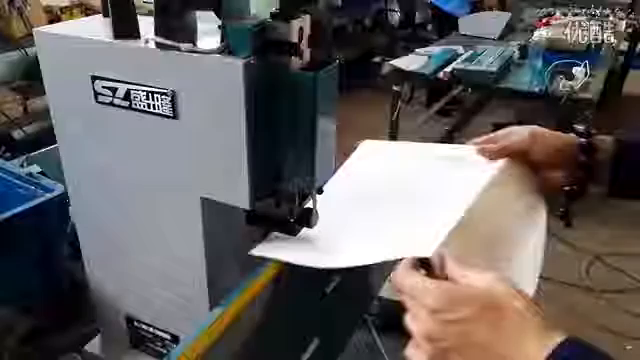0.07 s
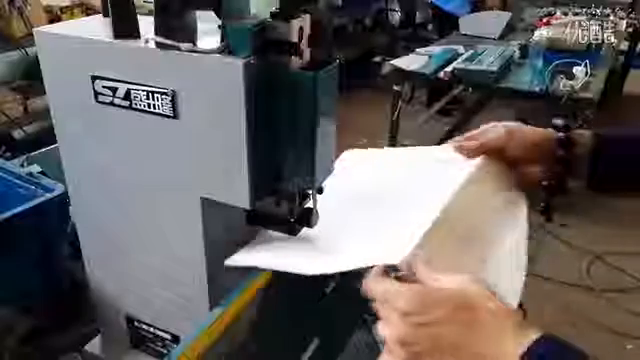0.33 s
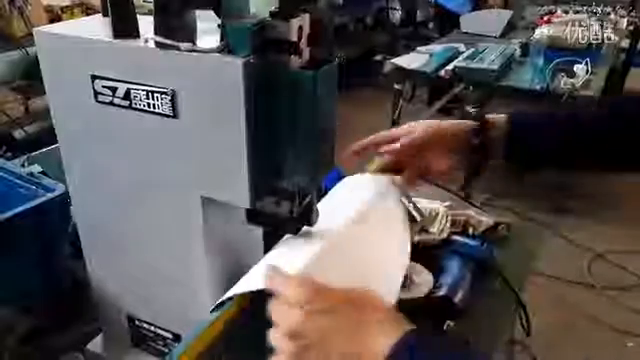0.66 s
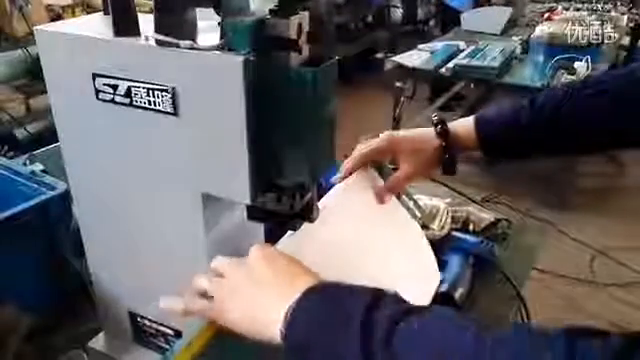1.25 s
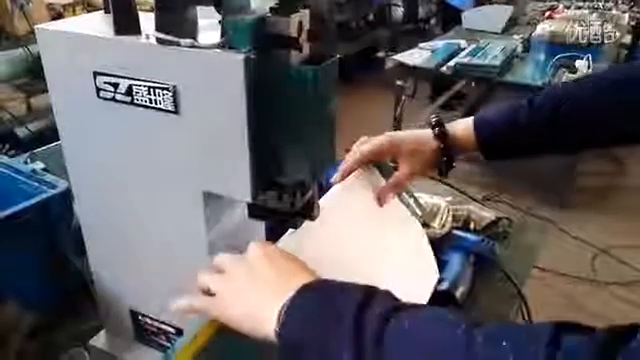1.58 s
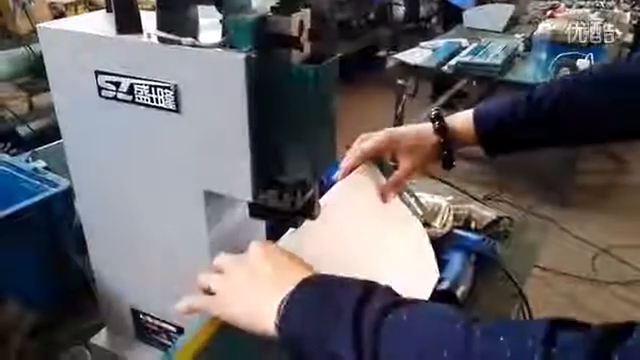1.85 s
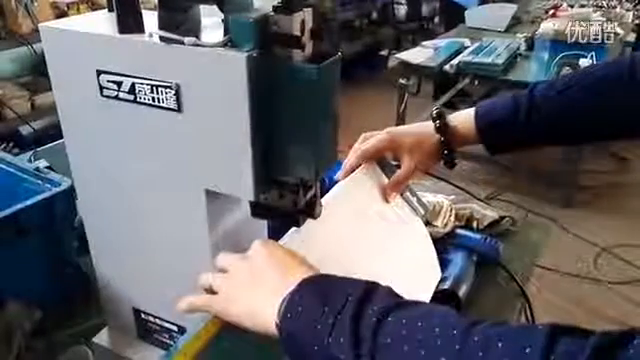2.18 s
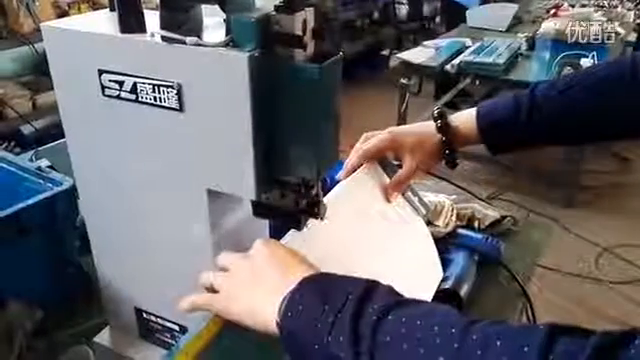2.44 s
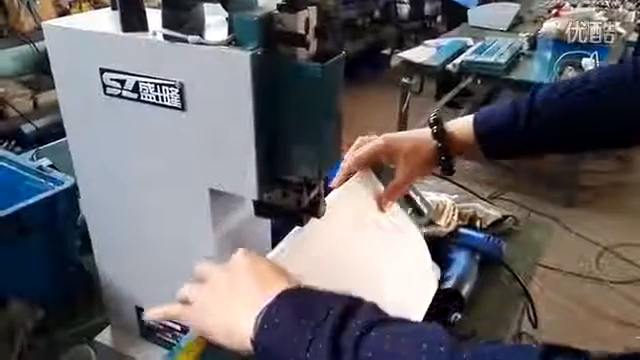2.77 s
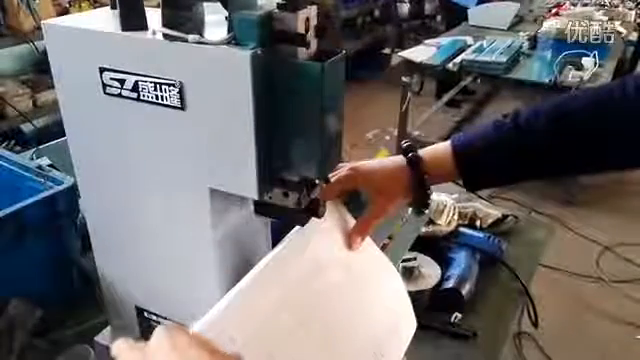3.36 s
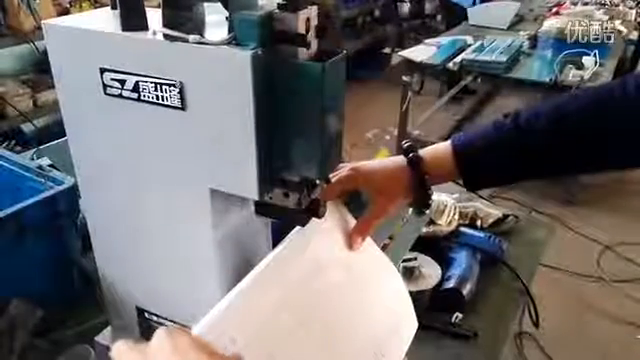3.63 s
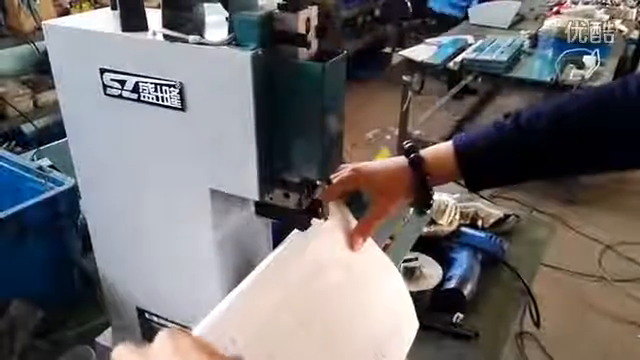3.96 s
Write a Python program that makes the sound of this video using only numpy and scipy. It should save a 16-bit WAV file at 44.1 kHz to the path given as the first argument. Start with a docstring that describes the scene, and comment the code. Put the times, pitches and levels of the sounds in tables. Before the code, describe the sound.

A wire stitching machine clatters through two metallic strokes over a low motor hum.

```python
"""A low hum, paper sliding, then two clattering strokes of a wire stitcher in a workshop.
Motor and flywheel idle while a folded sheet rubs over the saddle. Twice the clutch snaps in and
the head runs through a stroke: steel parts click, the frame knocks, the linkage rattles and the
staple is driven home with a thump. Between the strokes something clunks farther off."""
import sys
import numpy as np
from scipy import signal
from scipy.fft import rfft, irfft
from scipy.io import wavfile

SR = 44100
rng = np.random.default_rng(int(sys.argv[2]) if len(sys.argv) > 2 else 0)


def wav_out(sig):
    """Save sig, one row per channel (or a flat mono array), as 16-bit PCM at SR to the path in sys.argv[1]."""
    wavfile.write(sys.argv[1], SR, np.round(np.clip(np.atleast_2d(sig).T, -1, 1) * 32767).astype(np.int16))


N = 176400
TIME_S = np.arange(N) / SR

# Drive rumble. Each row: frequency in Hz, spectral density in dB.
RUMBLE_SPECTRUM = [(20, -27), (42, -19), (80, -10), (110, -15), (160, -2.5), (205, -5), (300, -2),
                   (380, -3.5), (500, -6.5), (680, -9), (860, -15), (1015, -8), (1130, -16), (1350, -16),
                   (1540, -11.5), (1700, -18), (2000, -19), (2900, -20), (3700, -26), (6000, -36.5),
                   (9000, -38), (12500, -40.5)]
# Drive hum lines. Each row: frequency in Hz, level in dB.
HUM_LINES = [(84, -58), (243.5, -42.5), (326, -41.5), (416, -51), (490, -53), (652, -44.5), (673, -47),
             (717, -61)]
# Resonances of the distant clunk. Each row: frequency in Hz, width in Hz, relative level in dB.
CLUNK_MODES = [(467, 170, -6), (778, 40, -5), (1110, 100, -6), (1670, 680, -4), (2400, 210, -14)]
# Sheet rubbing on the saddle; its edge scraping home. Each row: time in seconds, level in dB.
SLIDE_ENVELOPE = [(.2, -40.5), (.45, -36.5), (.56, -36), (.65, -29.5), (.74, -35.5), (.88, -43),
                  (1.0, -39.5), (1.2, -35.5), (1.36, -49.5), (1.46, -49), (1.58, -40), (1.73, -52.5),
                  (1.8, -44.5), (1.89, -55), (2.03, -44.5), (2.85, -39.5), (2.98, -37), (3.2, -41.5),
                  (3.29, -57)]
SCRAPE_ENVELOPE = [(.5, -68), (.6, -42), (.7, -36), (.76, -52), (.85, -80)]
# Sheet rub; edge scrape; linkage rattle. Each row: frequency in Hz, spectral density in dB.
SLIDE_SPECTRUM = [(200, 0), (700, 1.5), (1500, 4), (3000, -0.5), (5000, 1), (7000, -2), (9500, 1.5),
                  (13000, -12.5)]
SCRAPE_SPECTRUM = [(500, -12), (1700, 2), (2900, -2), (3800, -22), (10000, -17)]
RATTLE_SPECTRUM = [(100, -24), (500, -7), (950, -1), (2300, -1), (3100, -1.5), (3700, -8), (4800, -3.5),
                   (7000, -10.5), (9500, -8), (13000, -24)]
# Linkage rattle as the head moves. Each row: time in seconds, level in dB.
RATTLE_ENVELOPE = [(2.0, -55), (2.06, -30), (2.13, -30), (2.21, -28), (2.27, -25.5), (2.4, -28.5),
                   (2.48, -32), (2.53, -31.5), (2.61, -24.5), (2.68, -34.5), (2.74, -30), (2.82, -33.5),
                   (2.95, -45), (3.1, -67), (3.59, -48), (3.63, -29), (3.73, -36.5), (3.85, -33.5),
                   (3.93, -30), (4.0, -36)]
# Cabinet and saddle thumps. Each row: start in seconds, level in dB, pitch in Hz, decay in seconds.
THUMPS = [(1.443, -16, 314, .013), (1.460, -20, 174.5, 0.033), (1.51, -20.5, 200, 0.016),
          (1.976, -34.5, 84.7, 0.073), (2.36, -28.5, 128, 0.042), (2.432, -26.5, 170, 0.036),
          (2.55, -19.5, 283, 0.032), (2.574, -20, 325, 0.016), (2.598, -19, 304, .026),
          (2.638, -22.5, 274.2, 0.072), (2.708, -31.5, 111.7, 0.054), (2.78, -15.5, 150.3, 0.017),
          (3.78, -26.5, 140, 0.052), (3.851, -32, 138.5, .066), (3.934, -26, 157.4, 0.059)]
# Small steel parts; frame. Each row: frequency in Hz, spectral density in dB.
STEEL_SPECTRUM = [(300, -28), (1500, -28), (3000, -3), (3600, -9.5), (4400, -1), (5050, 2.5), (5450, 1.5),
                  (5900, 0), (6400, -2.5), (7000, -4), (7600, -1.5), (8700, -3), (10000, -6.5), (11300, -8),
                  (13000, -21)]
FRAME_SPECTRUM = [(80, -19), (400, -10), (750, -5), (1050, -2.5), (1350, -3), (1700, -2.5), (2000, -3.5),
                  (2400, -4.5), (3000, -7), (3700, -11.5), (4600, -11.5), (6500, -32), (12000, -25)]
# Ringing of the steel parts; of the frame. Each row: frequency in Hz, relative level in dB, T60 in seconds.
STEEL_MODES = [(4550, -10, .023), (5060, 12, 0.033), (6100, -4, 0.048), (6200, -17, .09),
               (7080, -16, 0.078), (8900, -16, 0.074), (8970, -10.5, 0.14)]
FRAME_MODES = [(1042, 0.5, 0.12), (1220, -5.5, 0.06), (1360, 0, 0.043), (1435, 6, .09), (1640, 0, 0.067),
               (1720, 6.5, .058), (2325, 6, 0.08)]
# Blows of the mechanism. Each row: start in seconds, steel snap in dB, frame knock in dB, contact decay
# in seconds, after-ring in dB, treble tilt in dB per octave, struck part's pitch in Hz, its level in dB.
BLOWS = [(.482, -40, -24.5, 0.0028, -30, -8, 1100, -38), (0.686, -41, -24, .003, -8, 5, 2650, -31),
         (0.711, -40, -27, 0.0044, -21, -1, 1860, -29), (1.204, -20, -17, 0.0013, -16, -3, 1630, -23),
         (1.446, -44.5, -27, 0.0023, -6, -2, 775, -24), (1.51, -48, -30, 0.002, -2, 1, 590, -28),
         (1.78, -30, -32, 0.0036, -17, 5, 9750, -40), (1.964, -37, -31, 0.0018, -14, 3, 850, -18),
         (2.071, -4, -25, 0.0015, -9.5, 4, 4980, -4.5), (2.1195, -32, -15.5, 0.0034, -8, 1, 1100, -26),
         (2.2314, -20.5, -13, 0.0042, -6.5, 0, 1330, -11), (2.254, -18, -16, .0033, -8, -3.5, 950, -27),
         (2.287, -21, -18.5, 0.011, -12, 3, 1080, -21), (2.2933, -24, -13.5, 0.0074, -18, 1, 2450, -16),
         (2.311, -19.5, -19, 0.0077, -17, 9, 1390, -34), (2.341, -15, -37, .0034, -23, 5, 6170, -18),
         (2.371, -4.5, -23, .0018, -16.5, -5.5, 5320, -12.5),
         (2.4217, -7.5, -7, 0.003, -38, 4, 8600, -11.5), (2.430, -36, -18, 0.0043, -14, 3, 2320, -13.5),
         (2.549, -26.5, -21.5, 0.015, -11, -8, 1010, -30), (2.567, -5.5, -12, 0.0069, -22, -2, 5540, -10),
         (2.575, -13, -24, .002, -12, 2, 9100, -10), (2.691, -5, -23, 0.0021, -27, 0, 8340, -14.5),
         (2.702, -17, -15.5, 0.0046, -14, -1.5, 4050, -20), (2.724, -40, -15.5, 0.0023, -9.5, -1, 940, -33),
         (2.752, -28.5, -22, .005, -7, -2, 8300, -25), (2.7754, -11.5, -8.5, 0.0036, -22, -3, 2910, -19),
         (2.8431, -2.5, -12, 0.0027, -26, 1.5, 4900, -11), (2.896, -27.5, -42, 0.015, -20, 7, 8300, -28),
         (3.054, -22, -48, 0.0069, -12, 6, 8500, -18.5), (3.606, -3, -21, 0.001, -13, 5.5, 5000, -9),
         (3.626, -27, -31, .002, -18, 7, 1150, -24), (3.655, -27, -17.5, 0.0055, -7.5, -3, 1920, -31),
         (3.764, -13.5, -13, 0.0025, -9.5, -1, 1170, -10.5),
         (3.784, -11.5, -16, 0.0021, -15, -1, 4700, -18), (3.7868, -28, -9.5, .0021, -14, 2, 1610, -12),
         (3.819, -36, -18, .004, -10, 6, 1350, -20), (3.825, -17, -14.5, 0.0031, -10, 2.5, 4380, -16),
         (3.844, -20.5, -24, 0.0046, -18, 6, 3100, -21), (3.8722, -14, -42, .003, -13, 4, 4400, -18.5),
         (3.881, -24, -33, .002, -20, -2, 4830, -20), (3.911, -17, -22, 0.0047, -6, -5, 613, -23),
         (3.954, -8, -11.5, 0.0047, -21, .5, 2430, -12.5), (3.963, -32, -18, 0.0038, -8, 1, 1750, -20)]
# Workshop reverberation. Each row: frequency in Hz, T60 in seconds.
ROOM_T60 = [(100, 0.54), (1000, 0.19), (4000, 0.44), (12000, 0.14)]
# Likeness of the two microphones. Each row: frequency in Hz, correlation from 0 to 1.
MIC_CORRELATION = [(30, 1), (180, 0.98), (350, 0.92), (700, 0.54), (1400, 0.059), (3000, 0.02),
                   (12000, 0.019)]
# Microphone imbalance. Each row: frequency in Hz, left minus right in dB.
MIC_BALANCE = [(60, 1), (350, -2), (700, -.5), (1400, 0.5), (3000, -1.5), (5500, 1.5), (7500, -2.5),
               (9000, -6), (12000, -10)]
# Opening fade. Each row: time in seconds, gain in dB.
FADE_IN = [(.2, -77), (.235, -32.5), (.3, -19.5), (.395, -10), (.41, -5.5), (.48, 1)]

ATTACK_S, BAND_LIMIT_HZ = 0.0014, 12200


def amp(db):
    """Decibels to gain."""
    return 10 ** (np.asarray(db) / 20)


def unit_rms(x):
    """Scales to rms 1."""
    return x / np.sqrt(np.mean(x ** 2) + 1e-20)


def lookup(table, hz):
    """Interpolates on a log-frequency axis."""
    table_hz, value = np.transpose(table)
    return np.interp(np.log(hz + 1), np.log(table_hz + 1), value)


def envelope(table):
    """Gain over time from rows of seconds and dB."""
    return amp(np.interp(TIME_S, *np.transpose(table)))


def add(mix, start_s, sound):
    """Mixes a sound in at start_s."""
    span = mix[:, round(start_s * SR):][:, :sound.shape[-1]]
    span += sound[..., :span.shape[1]]


def wander(rate_hz):
    """Random motion up to about rate_hz, rms 1."""
    t = np.linspace(0, N / SR, 1024)
    rolloff = 1 + (np.fft.rfftfreq(len(t), t[1]) / rate_hz) ** 4
    slow = irfft(rfft(rng.standard_normal(len(t))) / rolloff)
    return np.interp(TIME_S, t, unit_rms(slow))


def colour(x, spectrum, tilt_db_per_oct=0, size=2048):
    """Minimum-phase filter of unit energy; the tilt acts mainly above 1 kHz."""
    hz = abs(np.fft.fftfreq(size, 1 / SR))
    gain = amp(lookup(spectrum, hz) + tilt_db_per_oct * np.log2(1 + hz / 1000))
    gain /= 1 + (hz / BAND_LIMIT_HZ) ** 20
    log_response = np.conj(signal.hilbert(np.log(gain + 1e-5)))
    taps = np.fft.ifft(np.exp(log_response)).real
    return signal.fftconvolve(x, taps[None] / np.linalg.norm(taps), axes=1)[:, :x.shape[1]]


def diffuse(pair):
    """Makes two unrelated signals alike in the bass, as at two close microphones."""
    a, b = rfft(pair)
    same = lookup(MIC_CORRELATION, np.fft.rfftfreq(pair.shape[1], 1 / SR))
    return irfft(np.array([a, same * a + np.sqrt(1 - same ** 2) * b]), pair.shape[1])


def noise(size):
    """Diffuse stereo white noise."""
    return diffuse(rng.standard_normal((2, size)))


def resonance(hz, width_hz, size):
    """Stereo noise in one resonance, rms 1."""
    radius = np.exp(-np.pi * width_hz / SR)
    poles = [1, -2 * radius * np.cos(2 * np.pi * hz / SR), radius ** 2]
    return unit_rms(diffuse(signal.lfilter([1, 0, -1], poles, rng.standard_normal((2, size)))))


def grains(per_s, spread_db):
    """Dense random clicks of uneven size, rms 1."""
    sizes = amp(spread_db * np.minimum(rng.exponential(1, (2, N)), 4))
    signs = rng.choice([-1., 1.], (2, N))
    hits = rng.random((2, N)) < per_s / SR
    return unit_rms(diffuse(sizes * signs * hits))


def room(x, build_s=0.01):
    """The workshop's short tail, longest in the bass and near 4 kHz."""
    hz, t, bands = signal.stft(noise(SR // 2), SR, nperseg=256)
    shape = np.minimum(t / build_s, 1) * amp(-60 * t / lookup(ROOM_T60, hz)[:, None])
    tail = signal.istft(bands * shape, SR, nperseg=256)[1]
    return signal.fftconvolve(x, tail / np.linalg.norm(tail[0]), axes=1)[:, :N]


def reflections(x, paths=7, span_s=0.004, level_db=-2.5):
    """Echoes off cabinet, saddle and sheet comb the sound differently at each microphone."""
    taps = np.zeros((2, SR // 20))
    for side in taps:
        delays = 20 + (rng.random(paths) * span_s * SR).astype(int)
        side[delays] = amp(level_db) * rng.choice([-1., 1.], paths) / np.sqrt(paths)
        side[0] = 1
    return signal.oaconvolve(x, taps / np.linalg.norm(taps[0]), axes=1)[:, :x.shape[1]]


def drive(rumble_db=-31.5, flutter_db=1.23, drift_rad=0.94, drift_hz=4.66, waver_db=3.5):
    """Motor and flywheel: fluttering rumble under wavering hum lines."""
    rumble = colour(noise(N), RUMBLE_SPECTRUM, size=8192)
    rumble *= amp(rumble_db + flutter_db * wander(rate_hz=48.6))
    hum = 0
    for hz, db in HUM_LINES:
        mic_rad = np.arccos(lookup(MIC_CORRELATION, hz)) * np.array([[0], [1]])
        phase = 2 * np.pi * hz * TIME_S + drift_rad * wander(drift_hz)
        hum += np.sqrt(2) * amp(db + waver_db * wander(drift_hz)) * np.sin(phase + mic_rad)
    return rumble + hum


def distant_clunk(start_s=3.153, rise_s=0.043, scrape_s=0.053, ring_s=0.051, ring_hz=778, level_db=-26):
    """Something scrapes and rings across the workshop, blurred by distance."""
    t = np.maximum(TIME_S - start_s, 0)
    past_peak_s = np.maximum(t - rise_s, 0)
    scrape = sum(amp(db) * resonance(hz, width_hz, N) for hz, width_hz, db in CLUNK_MODES)
    scrape *= np.exp(-past_peak_s / scrape_s)
    ring = amp(1) * np.sin(2 * np.pi * ring_hz * t) * np.exp(-past_peak_s / ring_s)
    return amp(level_db) * np.minimum(t / rise_s, 1) * (scrape + ring)


def paper(catch_db=1):
    """The sheet rubs and catches on the saddle in fine grains; its edge scrapes in coarser ones."""
    catching = amp(catch_db * wander(rate_hz=33.7))
    rub = colour(grains(per_s=4000, spread_db=-2), SLIDE_SPECTRUM)
    scrape = colour(grains(per_s=180, spread_db=3), SCRAPE_SPECTRUM)
    return envelope(SLIDE_ENVELOPE) * catching * rub + envelope(SCRAPE_ENVELOPE) * scrape


def linkage(judder_db=2):
    """Cams and slides rattle and judder through each stroke."""
    judder = amp(judder_db * wander(rate_hz=89))
    rattle = colour(grains(per_s=600, spread_db=-0.5), RATTLE_SPECTRUM)
    return envelope(RATTLE_ENVELOPE) * judder * rattle


def thumps(rise_s=0.0063, puff_db=-6):
    """A panel booms briefly, with a dull puff around its note."""
    out, t = np.zeros((2, N)), np.arange(SR // 3) / SR
    for start_s, db, hz, decay_s in THUMPS:
        boom = np.sin(2 * np.pi * hz * t) + amp(puff_db) * resonance(hz, hz / 2, len(t))
        add(out, start_s, amp(db) * (1 - np.exp(-t / rise_s)) * np.exp(-t / decay_s) * boom)
    return out


def modes(table, t):
    """A part's decaying tones, one row per mode."""
    return np.array([amp(db - 60 * t / t60_s) * np.sin(2 * np.pi * hz * t) for hz, db, t60_s in table])


def chatter(t, decay_s, ring_db, ring_s, direct_share=0.29, left_lead_s=0.00011):
    """Metal contact, partly straight to both microphones, then the part's dense ring."""
    direct = rng.choice([-1., 1.], len(t))
    direct = np.array([direct, np.roll(direct, round(left_lead_s * SR))])
    contact = np.sqrt(direct_share) * direct + np.sqrt(1 - direct_share) * noise(len(t))
    strike = amp(8.5) * np.exp(-t / 0.00053)  # the first instant is the hardest
    ring = noise(len(t)) * amp(ring_db) * np.exp(-t / ring_s)
    return (1 - np.exp(-t / ATTACK_S)) * (contact * (np.exp(-t / decay_s) + strike) + ring)


def struck_part(t, hz, contact_s, ring_s=0.0045, count=4, spread=0.0325, scatter_rad=0.79):
    """The part's own note: close modes drift apart and die soon after contact ends."""
    offsets = np.linspace(-1, 1, count)[:, None] + rng.uniform(-0.9, 1, (count, 1)) / 2
    modes_hz = hz * (1 + spread * offsets)
    mic_rad = scatter_rad * rng.standard_normal((2, count, 1))
    cluster = np.sin(2 * np.pi * modes_hz * t + mic_rad).sum(1)
    fade = (1 - np.exp(-t / ATTACK_S)) * np.exp(-t / np.hypot(ring_s, contact_s))
    return fade * cluster * np.linalg.norm(fade) / np.linalg.norm(fade * cluster)


def blows():
    """Each blow snaps the steel, knocks the frame and rings one part, from its own place in the head."""
    out, t = np.zeros((2, N)), np.arange(6144) / SR
    steel_tones = amp(-8) * modes(STEEL_MODES, t)
    frame_tones = amp(-21) * modes(FRAME_MODES, t)
    for start_s, steel_db, frame_db, decay_s, ring_db, tilt_db_per_oct, part_hz, part_db in BLOWS:
        steel = colour(chatter(t, decay_s, ring_db, ring_s=0.023), STEEL_SPECTRUM, tilt_db_per_oct)
        steel += amp(ring_db) * rng.standard_normal((2, len(steel_tones))) @ steel_tones
        frame = colour(chatter(t, decay_s, ring_db, ring_s=0.028), FRAME_SPECTRUM, tilt_db_per_oct)
        frame += rng.standard_normal((2, len(frame_tones))) @ frame_tones
        impact = reflections(amp(steel_db) * steel + amp(frame_db) * frame)
        add(out, start_s, impact + amp(part_db) * struck_part(t, part_hz, decay_s))
    return out


def scene():
    """Stitcher and paper with their room tail, over the drive and the distant clunk."""
    stitcher = blows() + reflections(linkage() + paper()) + thumps()
    return stitcher + amp(-17.5) * room(stitcher) + drive() + distant_clunk()


def record(dry):
    """Unequal microphones, fade-in, overload on the sharpest peaks, band limit."""
    lean_db = lookup(MIC_BALANCE, np.fft.rfftfreq(N, 1 / SR)) / 2
    mics = irfft(rfft(dry) * amp([lean_db, -lean_db]), N)
    faded = mics * envelope(FADE_IN) * (TIME_S > FADE_IN[0][0])
    clipped = np.clip(faded, -0.88, 0.88)
    lowpass = signal.firwin(161, BAND_LIMIT_HZ, window=("kaiser", 8), fs=SR)
    return signal.oaconvolve(clipped, lowpass[None], "same")


dry = scene()
out = record(dry)
wav_out(out)
```